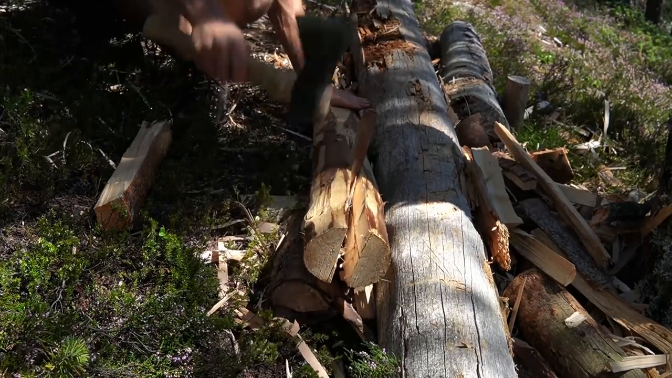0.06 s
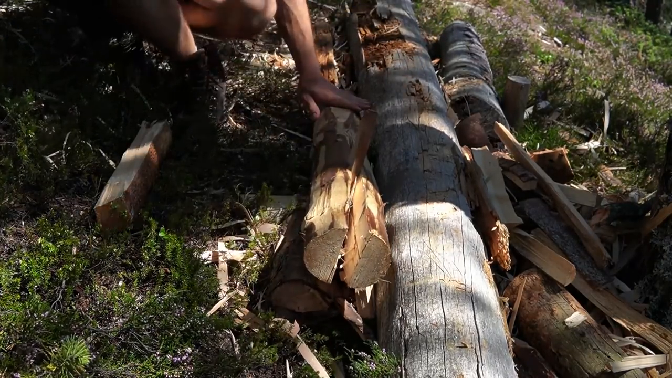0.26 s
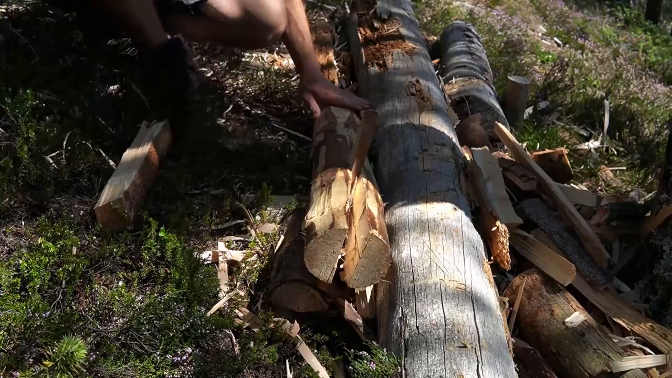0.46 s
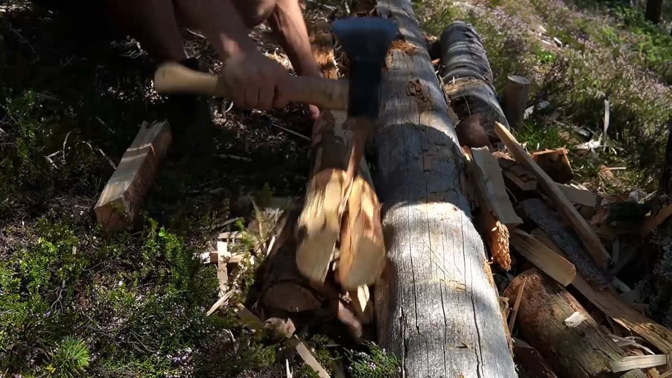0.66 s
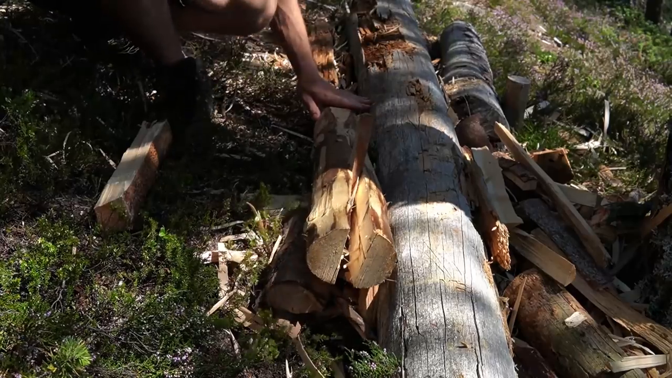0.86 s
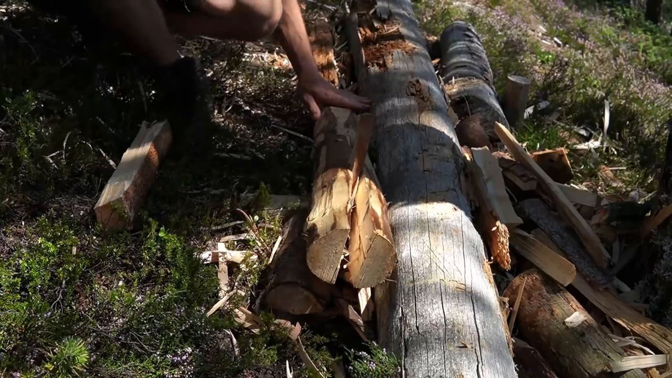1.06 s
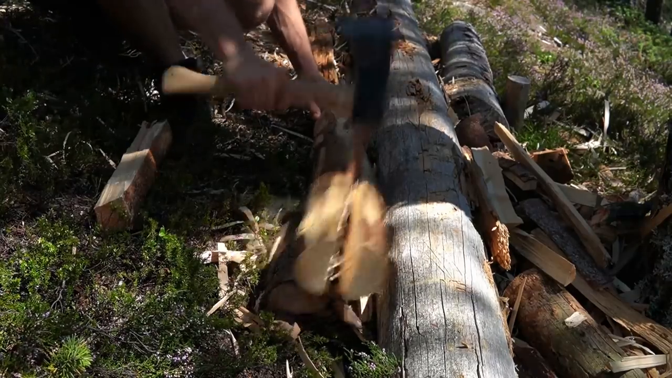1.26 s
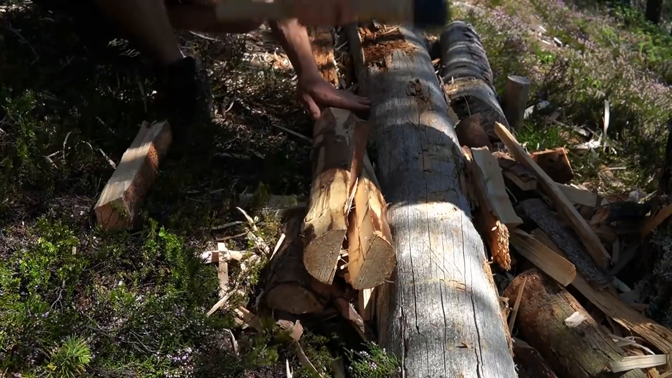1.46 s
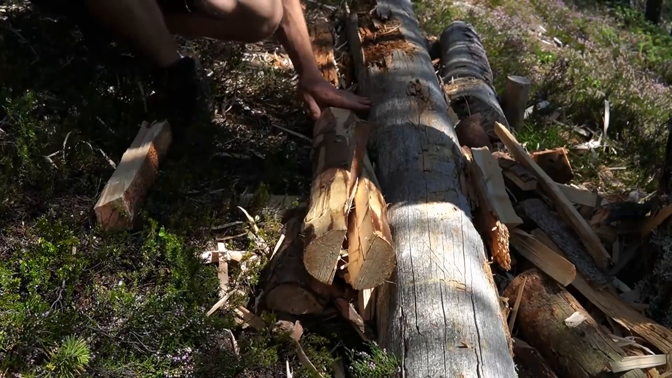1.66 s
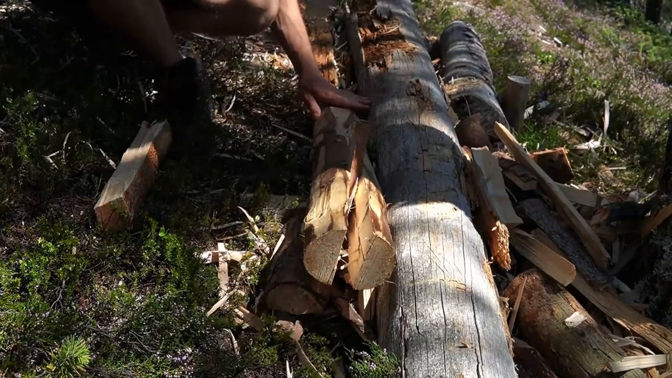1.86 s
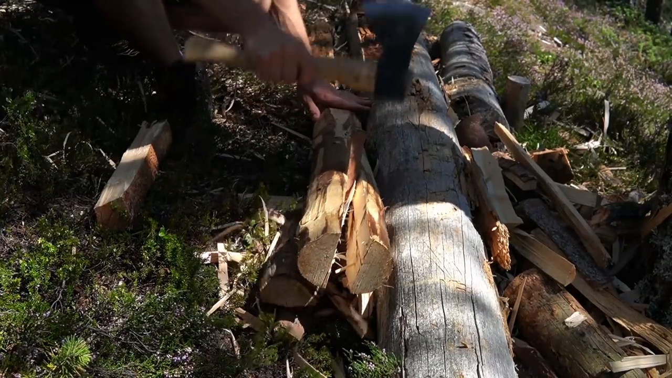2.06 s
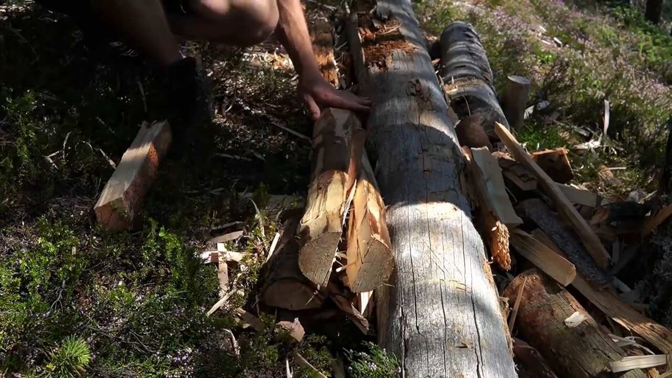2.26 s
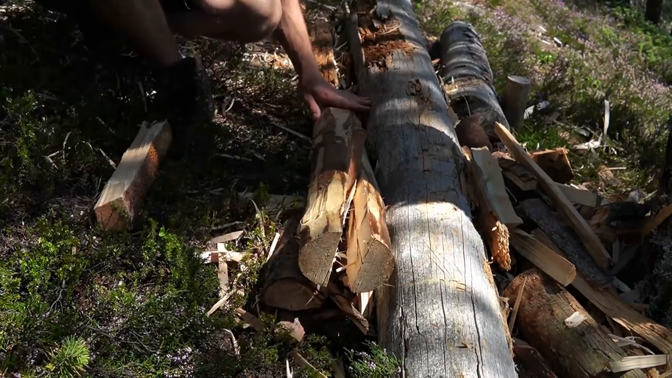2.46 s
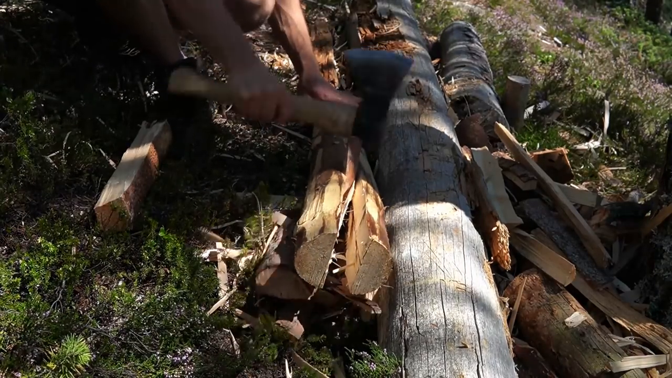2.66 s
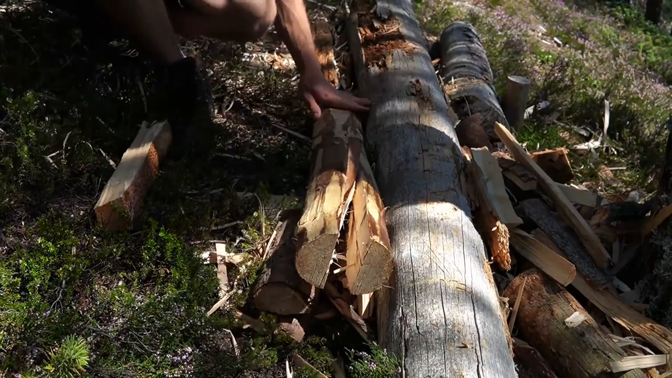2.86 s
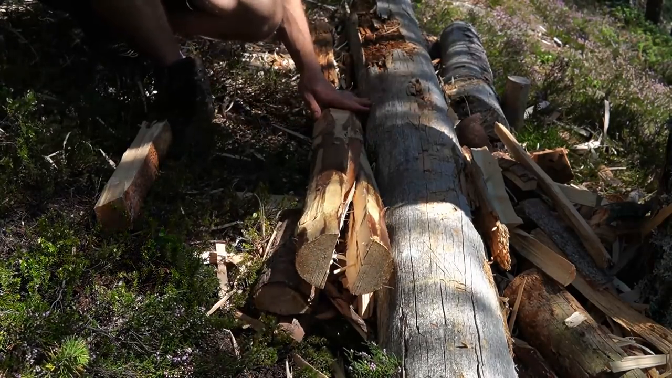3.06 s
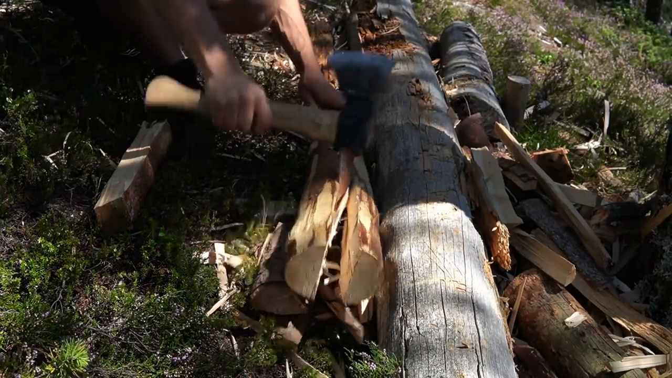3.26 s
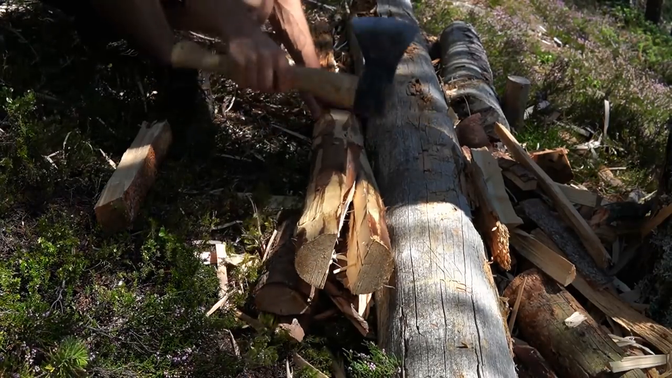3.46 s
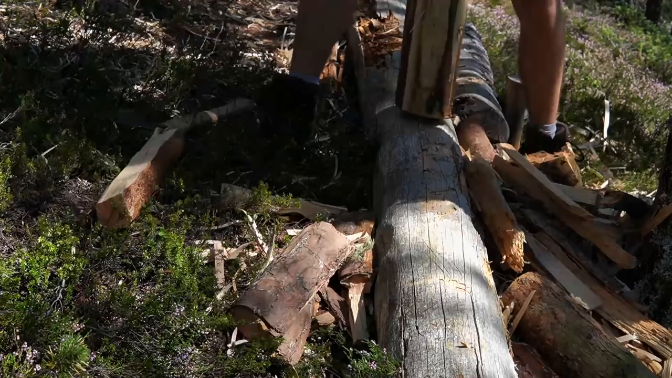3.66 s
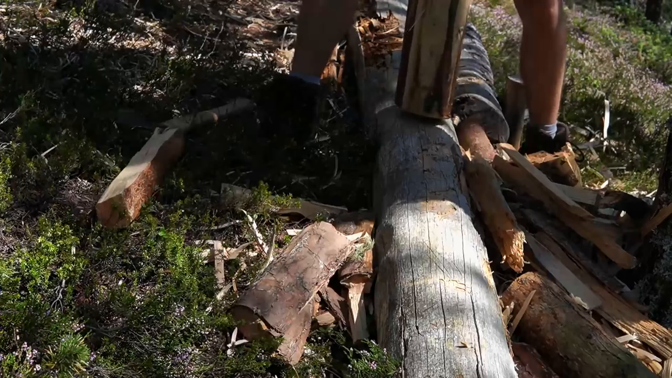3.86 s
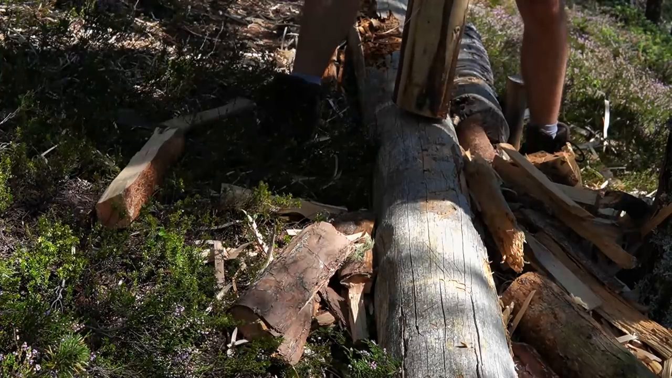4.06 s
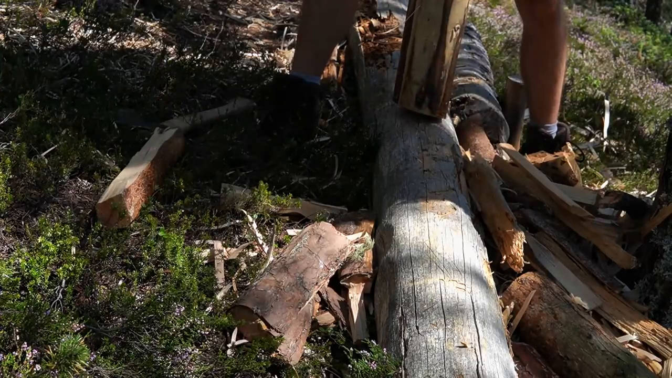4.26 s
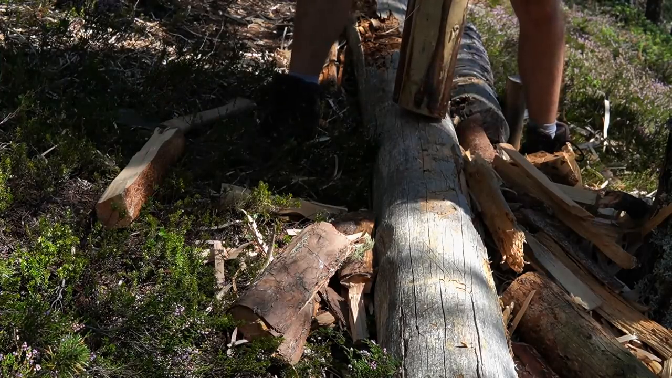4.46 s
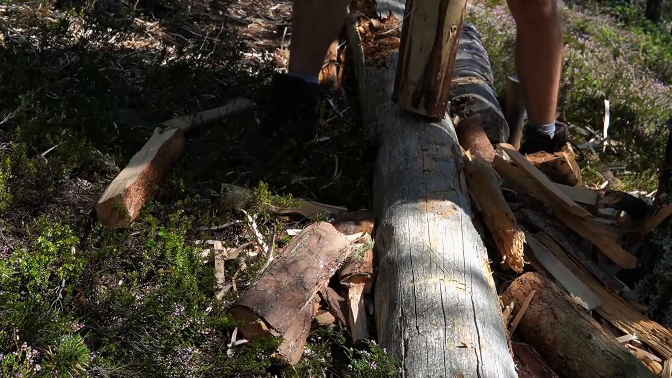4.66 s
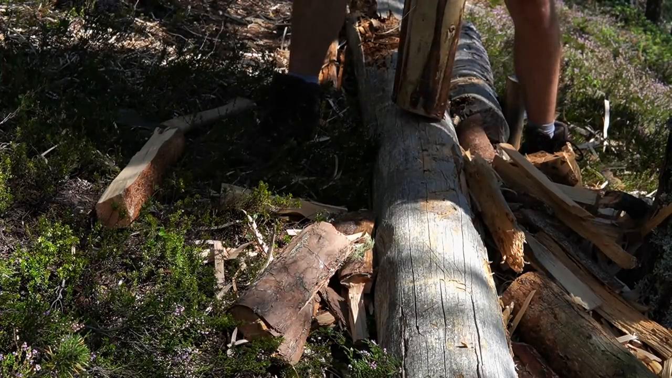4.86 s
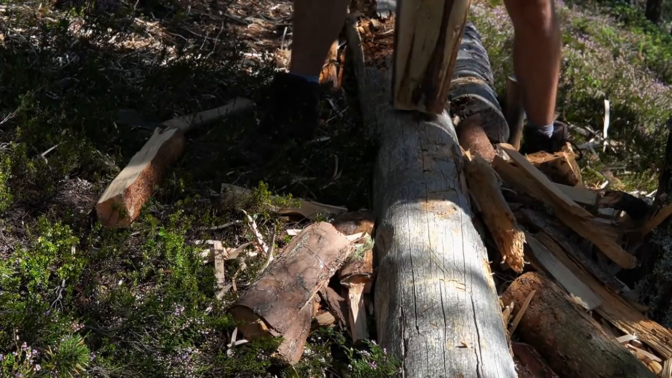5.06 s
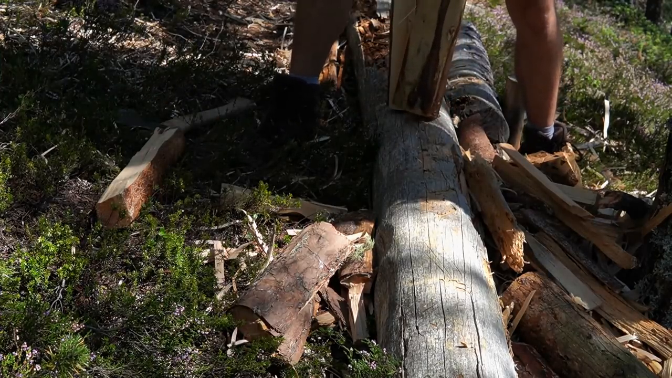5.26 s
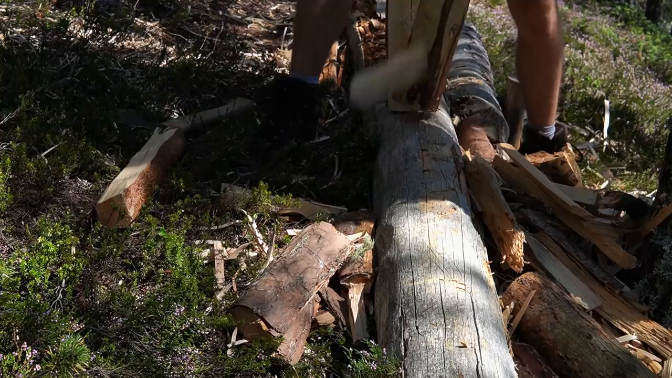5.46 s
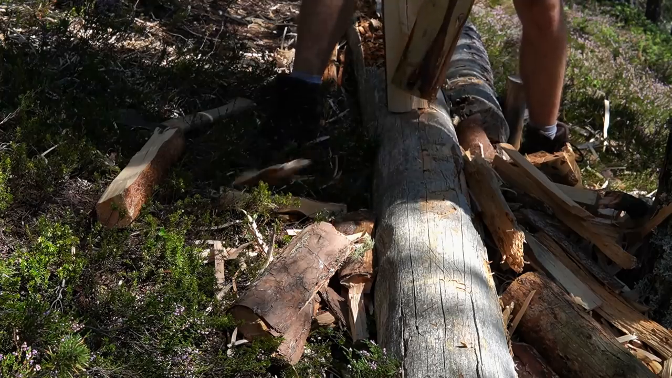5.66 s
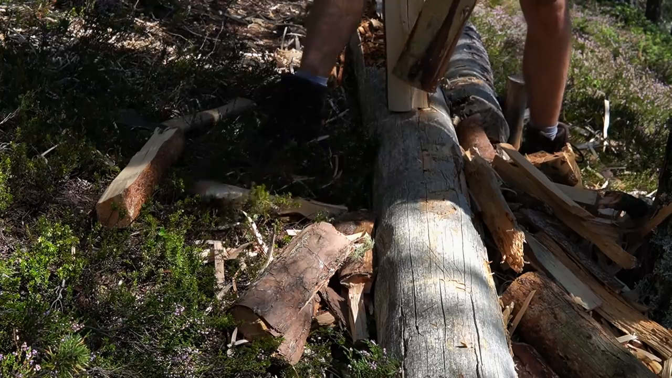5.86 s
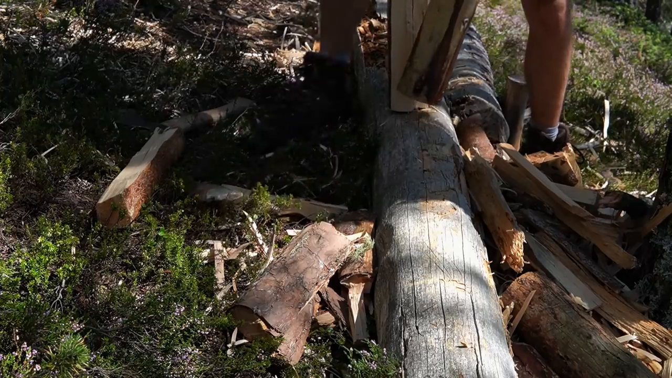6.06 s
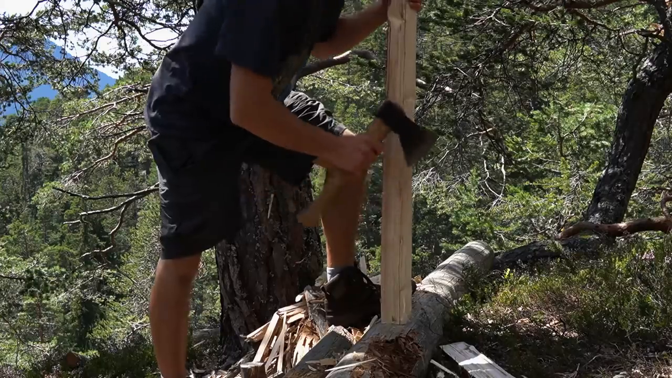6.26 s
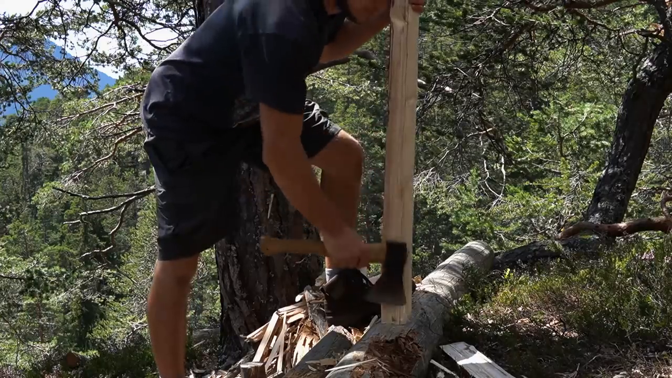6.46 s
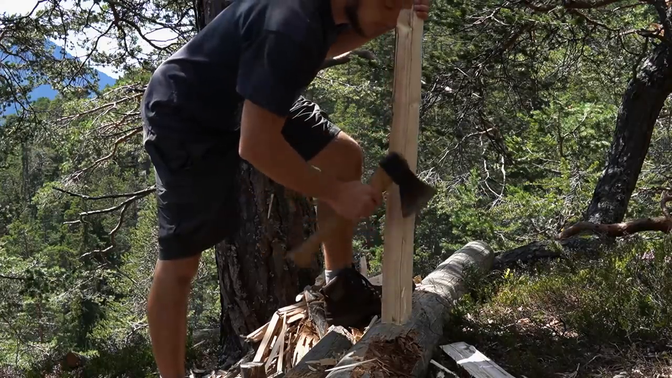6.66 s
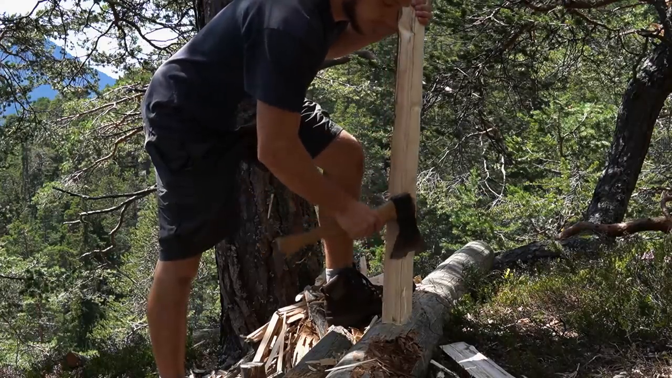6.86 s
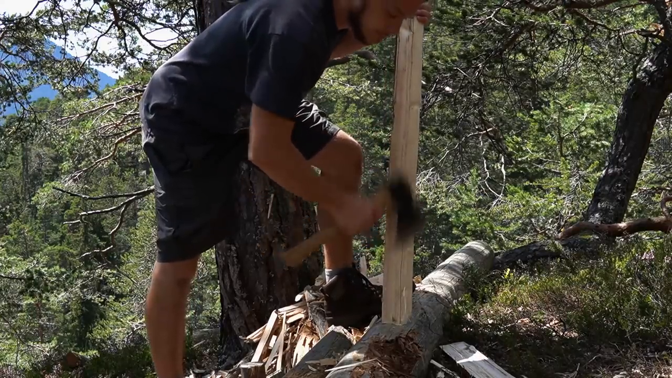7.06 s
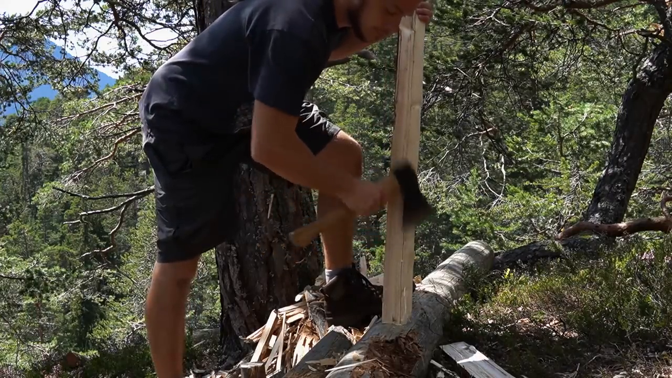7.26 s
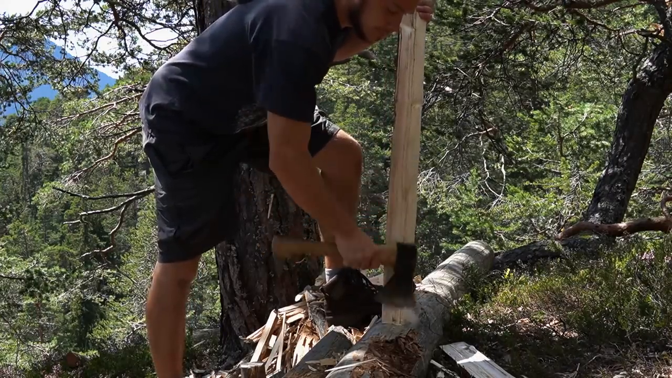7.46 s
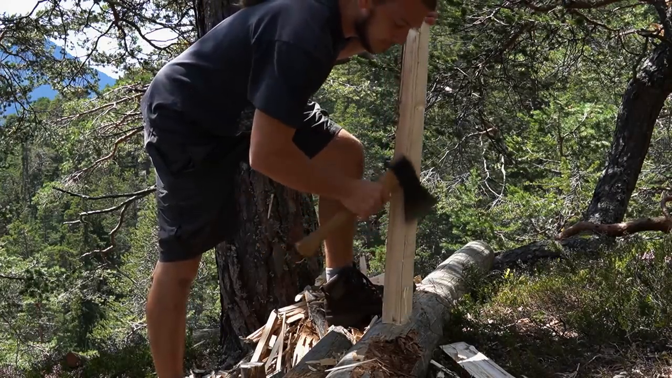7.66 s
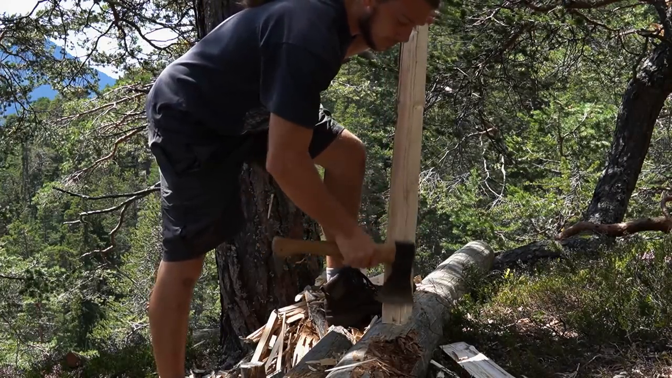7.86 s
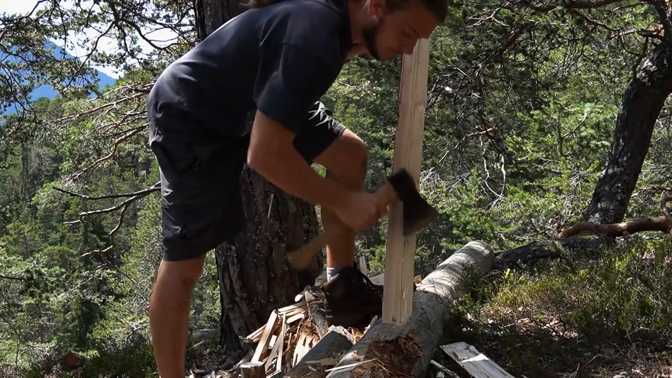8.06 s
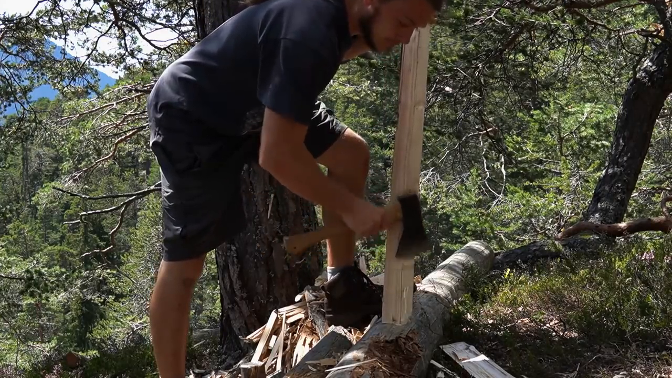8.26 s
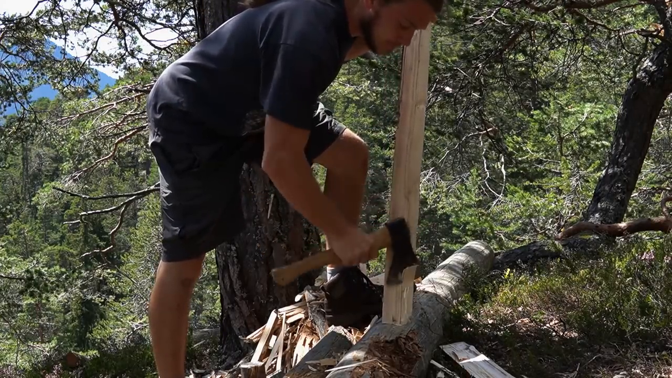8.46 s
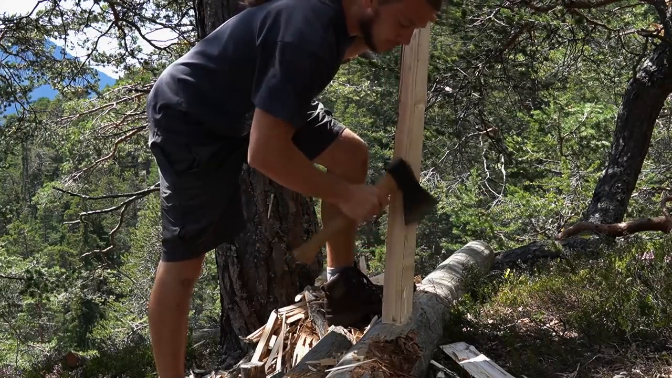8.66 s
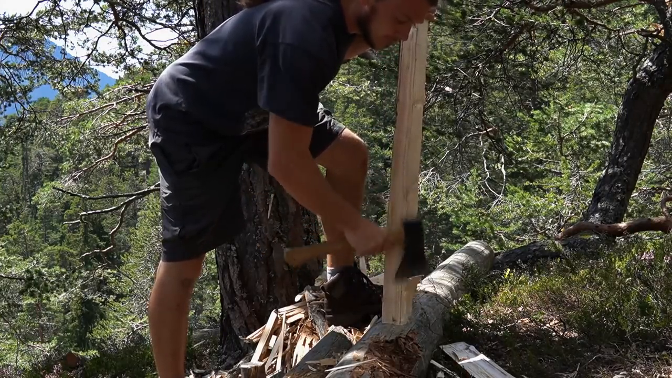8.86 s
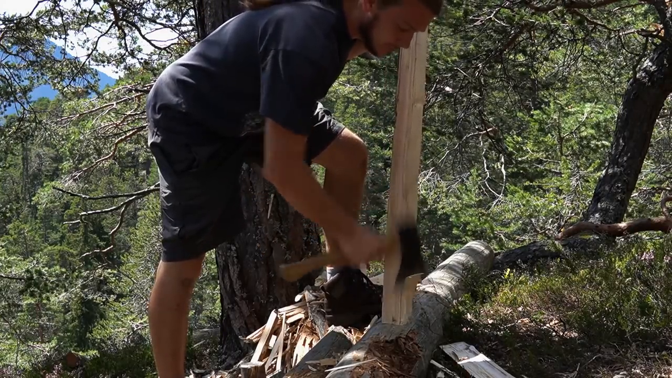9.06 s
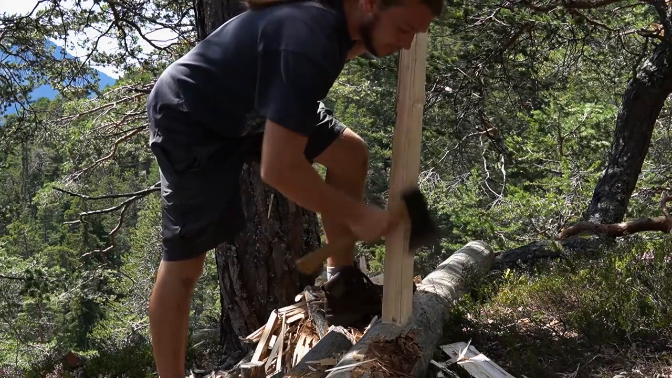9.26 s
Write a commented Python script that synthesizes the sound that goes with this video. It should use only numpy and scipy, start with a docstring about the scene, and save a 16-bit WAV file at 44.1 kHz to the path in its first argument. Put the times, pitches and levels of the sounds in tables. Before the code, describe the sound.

Outdoors in a forest, low wind buffets the microphone while a hatchet strikes a log five times, loud and bright, with knocking wood, tearing fibres and faintly singing steel. The wind abruptly drops; a billet is pried apart with sharp snaps and one piece lands with a hollow knock. Quick, much quieter strokes then trim an upright pole.

```python
"""Gusty wind in a forest, with wood shaking and steel ringing faintly, opens onto hatchet blows into a log.
The log rings at its modes and knocks on its neighbours; fibres tear as shaped noise and snap as short cracks.
After a cut to a second scene a standing billet is prised apart, its fibres snapping, and a piece drops as a
ring of its own modes; last, quick light strokes trim an upright pole. The steel head sings on after blows as
beating, fluttering sines, bent in pitch by its swing. The wind is low noise under gust curves, over a soft hiss."""
import sys
import numpy as np
from scipy import signal
from scipy.fft import rfft, irfft
from scipy.io import wavfile
from scipy.ndimage import uniform_filter1d

SR = 44100
rng = np.random.default_rng(int(sys.argv[2]) if len(sys.argv) > 2 else 0)


def materialize(psi):
    """Save the field psi as 16-bit PCM at rate SR to the path in sys.argv[1].

    A 1-D psi becomes a single channel; in a 2-D psi each row is a channel.
    """
    bounded = np.clip(np.atleast_2d(psi).T, -1, 1)
    quanta = np.round(bounded * 32767).astype(np.int16)
    wavfile.write(sys.argv[1], SR, quanta)


N = 410130
SCENE_CUT_S = 3.635  # cut from the log scene to the billet and pole scenes

# Hatchet blows into the log, then strokes on the pole. Each row: start in seconds, knock pitch in Hz,
# knock in dB, slap pitch in Hz, slap in dB, crack in dB, top octave in dB, thud in dB, knock t60 in seconds.
HEAVY_BLOWS = [(0.6902, 850, -6, 1514, 2, -1, -19, -23.5, 0.021),
               (1.3147, 830, -7, 1464, 1.5, 0.5, -5.5, -18, 0.018),
               (1.9697, 838, -5.5, 1850, -0.5, -2.5, -7, -13.5, 0.019),
               (2.6205, 831, -3, 1394, -3, 2, -14.5, -23, 0.022),
               (3.306, 802, -2, 1500, -5, -1.5, -11, -15, 0.017)]
LIGHT_BLOWS = [(6.4452, 420, -19.5, 970, -25, -37, -42, -19.5, 0.012),
               (6.7974, 649, -13, 1191, -24.5, -25.5, -38.5, -20, 0.021),
               (7.128, 670, -9.5, 1150, -21, -34.5, -47, -18, 0.014),
               (7.451, 750, -15.5, 1216, -17, -14.5, -38.5, -21.5, 0.024),
               (7.791, 781, -17, 1233, -12.5, -34, -57, -22, 0.03),
               (8.174, 793, -10, 1233, -8.5, -22, -38, -19, 0.02),
               (8.4766, 613, -14.5, 1214, -9, -23, -45, -43, 0.015),
               (8.7887, 792, -15.5, 1214, -21.5, -25.5, -52, -22.5, 0.029),
               (9.0896, 797, -24, 1250, -21, -33, -47.5, -26.5, 0.031)]
# Modes of the log and of the pole. Each row: frequency in Hz, level in dB, t60 in seconds.
LOG_MODES = [(254.3, -0.5, 0.11), (364.6, 1.5, 0.08), (563, -9.5, 0.013), (847, -1, 0.048),
             (1374, -12.5, 0.13)]
POLE_MODES = [(236, 4.5, 0.022), (340, 8.5, 0.018), (522, -16, 0.078), (775, -3, 0.034)]


def gain_of(db):
    """Amplitude factor of a level in dB."""
    return 10 ** (np.asarray(db) / 20)


def evened(x):
    """Scales x to rms 1."""
    return x / np.sqrt(np.mean(x ** 2) + 1e-20)


def peaked(x):
    """Scales x to peak 1."""
    return x / (abs(x).max() + 1e-12)


def add(mix, start_s, sound):
    """Adds a sound into the mix in place, cut at the end."""
    part = mix[round(start_s * SR):][:len(sound)]
    part += sound[:len(part)]


def above(x, hz):
    """Fourth-order high-pass."""
    return signal.sosfilt(signal.butter(4, hz, "high", fs=SR, output="sos"), x)


def below(x, hz):
    """Fourth-order low-pass."""
    return signal.sosfilt(signal.butter(4, hz, "low", fs=SR, output="sos"), x)


def coloured(x, points):
    """Filters x by a curve of (Hz, dB) points, straight in log frequency; rms 1."""
    point_hz, point_db = np.transpose(points)
    hz = np.fft.rfftfreq(len(x), 1 / SR)
    db = np.interp(np.log(hz + 1), np.log(point_hz + 1), point_db)
    return evened(irfft(rfft(x) * gain_of(db), len(x)))


def resonate(x, hz, width_hz):
    """A two-pole resonance of gain 1."""
    return signal.lfilter(*signal.iirpeak(hz, hz / max(width_hz, 1), SR), x)


def body(x, modes):
    """Noise x through the modes of a piece of wood; a mode's width is set by its t60."""
    out = 0
    for k, (hz, db, t60_s) in enumerate(modes):
        out = out + (-1) ** k * gain_of(db) * evened(resonate(x, hz, 2.0 / t60_s))
    return evened(out)


def ring(modes, rise_ms):
    """Modes struck once, peak 1; their strengths differ a little, as each blow lands elsewhere."""
    t = np.arange(round(.2 * SR)) / SR
    out = 0
    for k, (hz, db, t60_s) in enumerate(modes):
        fall = gain_of(db + 2.6 * rng.standard_normal() - 60 * t / t60_s)
        out = out + (-1) ** k * fall * np.sin(2 * np.pi * hz * t)
    return peaked(out * (1 - np.exp(-t * 1000 / rise_ms)))


def dying(t60_s):
    """Noise with a sudden sharp start that dies in t60_s, over a fainter and longer tail."""
    t = np.arange(round(.2 * SR)) / SR
    fall = gain_of(-60 * t / max(t60_s, .004))
    tail = gain_of(-22.5 - 60 * t / max(1.2 * t60_s, .01))
    spike = np.exp(-t / 0.00045)
    return rng.standard_normal(len(t)) * (fall + tail + spike) * np.minimum(t / 0.00023, 1)


def tick(t60_s, low_hz, high_hz, hz):
    """A crack as its middle band, with one favoured pitch, and its top octave; each peak 1."""
    x = dying(t60_s)
    middle = above(below(x, high_hz), low_hz)
    top = below(above(x, 7500), 15000)
    return peaked(middle + 2.0 * resonate(middle, hz, 900)), peaked(top)


def grainy(rough_db, size):
    """Noise whose level flickers by rough_db rms in grains of size samples."""
    flicker = evened(uniform_filter1d(rng.standard_normal(N), size))
    return rng.standard_normal(N) * gain_of(rough_db * flicker)


def envelope(tables, column):
    """Gain over time from tables of dB curves, silent between them."""
    t, out = np.arange(N) / SR, np.zeros(N)
    for rows in tables:
        rows = np.array(rows)
        out += gain_of(np.interp(t, rows[:, 0], rows[:, column], -200, -200))
    return uniform_filter1d(out, size=180)


def swell(start_s, rise_s, rise_db, peak_db, fall_db_per_s):
    """Gain that climbs rise_db to its peak, then falls evenly; stops at the next blow, the scene cut or the end."""
    t = np.arange(N) / SR
    late_s = t - start_s - rise_s
    stops_s = np.array([row[0] for row in HEAVY_BLOWS + LIGHT_BLOWS] + [SCENE_CUT_S, N / SR])
    alive = (t >= start_s) & (t < stops_s[stops_s > start_s + .1].min())
    return alive * gain_of(peak_db + np.where(late_s < 0, rise_db * late_s / rise_s, -fall_db_per_s * late_s))


def wind():
    """Low buffeting on the microphone, deeper in the early gusts, over the soft, nearly steady hiss of far leaves."""
    # Gust curves. Each row: time in seconds, level in dB.
    gusts = [
        [(0.0, -41), (0.72, -30.5), (1.65, -36.5), (3.35, -30.5), (3.64, -37.5)],
        [(3.64, -48.5), (3.81, -62.5), (4.37, -65.5), (5.44, -62), (6.18, -52)],
        [(6.18, -52.5), (6.54, -59.5), (7.03, -54), (7.2, -61), (7.85, -57), (8.48, -67), (9.3, -51)],
    ]
    # Spectra of early gusts, lighter wind and far leaves. Each row: frequency in Hz, density in dB per Hz.
    gusty_spectrum = [(8.8, -31), (15, -4), (43, -0.5), (81, -0.5), (164, -8.5), (396, -34), (600, -39),
                      (780, -55.5), (1320, -120)]
    calm_spectrum = [(12, -23), (25, -7), (50, 1.5), (85, 4.5), (150, -4), (260, -14.5), (420, -55.5)]
    leaf_spectrum = [(59, -45.5), (100, -5.5), (141, -4.5), (262, -11.5), (418, -16.5), (541, -20.5),
                     (1050, -19), (1190, -18.5), (4480, -26.5), (7020, -39), (14500, -45.5), (16500, -55)]
    leaf_db = -58.5
    noise = rng.standard_normal(N)
    gusty = np.arange(N) / SR < gusts[0][-1][0]
    buffet = np.where(gusty, coloured(noise, gusty_spectrum), coloured(noise, calm_spectrum))
    leaves = coloured(grainy(rough_db=.4, size=4000), leaf_spectrum)
    return buffet * envelope(gusts, column=1) + gain_of(leaf_db) * leaves


def crackling(per_s):
    """Hiss broken by sparse tiny bursts, a few of them large."""
    size = gain_of(4.0 * np.minimum(rng.exponential(1, N), 3)) * (rng.random(N) < per_s / SR)
    bursts = signal.lfilter([1], [1, -np.exp(-1 / (0.00084 * SR))], size)
    return grainy(rough_db=2.0, size=100) * (1 + 2.0 * bursts)


def tearing():
    """Loose contact shakes the wood; parting fibres and chips hiss and crackle."""
    # Loose wood after blows, swelling then dying. Each row: start in seconds, swell in seconds,
    # shaking in dB, tearing in dB, top octave in dB, fall of the tearing in dB per second.
    after_blows = [(-0.04, 0.048, -38, -44, -54.5, 150), (0.689, 0.043, -30.5, -33.5, -50.5, 117.5),
                   (1.313, 0.049, -31, -33.5, -43.5, 116), (1.97, 0.031, -28, -34.5, -45.5, 132.5),
                   (2.622, 0.022, -23, -31.5, -45, 162.5), (3.306, 0.031, -32, -36.5, -47.5, 146),
                   (6.4472, .01, -38, -41, -47.5, 456), (6.796, 0.0041, -26, -42, -58, 700),
                   (7.128, 0.0059, -28.5, -40.5, -42, 700), (7.451, 0.015, -34, -40, -41, 388),
                   (7.791, 0.01, -34, -42, -53, 252), (8.173, 0.009, -34, -40.5, -72, 500),
                   (8.478, 0.0087, -24.5, -37, -48.5, 701), (8.789, 0.013, -38, -45, -49, 305),
                   (9.09, 0.083, -37.5, -45.5, -54, 248)]
    # Log shifted, billet strained. Each row: time in seconds, fibres in dB, top octave in dB.
    strain = [
        [(0.36, -71, -74), (0.516, -49.5, -56.5), (0.612, -59.5, -59.5), (0.66, -65, -76)],
        [(3.66, -78.5, -88), (3.9, -83.5, -69.5), (4.2, -88, -82), (4.5, -82.5, -70), (4.64, -57.5, -60.5),
         (4.75, -77, -67.5), (4.805, -44, -48.5), (4.86, -71, -59), (4.9, -60, -51), (4.95, -81.5, -64),
         (5.06, -66, -62), (5.075, -41.5, -39), (5.17, -42.5, -45), (5.2, -55.5, -56), (5.28, -55, -61),
         (5.33, -82.5, -81), (5.55, -77.5, -88.5), (5.585, -59, -69.5), (5.66, -65, -67), (5.7, -57, -59),
         (5.76, -68, -65), (5.86, -65, -60), (5.96, -65.5, -62.5), (6.175, -58.5, -60.5)],
    ]
    # Low scuffing of the billet's foot. Each row: time in seconds, level in dB.
    groan = [
        [(3.64, -63), (4.2, -72.5), (5.5, -74.5), (5.76, -61), (5.92, -73), (6.1, -66.5), (6.175, -60)],
    ]
    # Spectra of parting fibres and of rubbed wood. Each row: frequency in Hz, density in dB per Hz.
    tear_spectrum = [(590, -42.5), (1000, -6.5), (1390, -2), (1820, -4.5), (4540, -12), (6610, -30),
                     (15000, -41), (16500, -51.5)]
    scuff_spectrum = [(120, -41.5), (220, -4), (400, 2), (800, -4.5), (1300, -10.5), (1800, -43)]
    swell_db, shake_fall, top_fall = 6.5, 1.34, 0.87  # falls relative to tearing
    groan_db, dry_hz = -4, 1810  # groan relative to fibres; thin billet fibres crackle only above dry_hz

    after_cut = np.arange(N) / SR > SCENE_CUT_S
    shake = grainy(rough_db=2.0, size=300)
    scuff = coloured(shake, scuff_spectrum)
    wood = np.where(after_cut, scuff, body(shake, LOG_MODES) + .4 * scuff)
    noise = crackling(per_s=70)
    middle = evened(below(coloured(noise + 2.2 * rng.standard_normal(N), tear_spectrum), 7000))
    top = evened(above(coloured(noise, tear_spectrum), 7000))
    thin = np.where(after_cut, evened(above(middle, dry_hz)), middle)

    out = (gain_of(groan_db) * wood + thin) * envelope(strain, column=1)
    out = out + wood * envelope(groan, column=1)
    out = out + top * envelope(strain, column=2)
    for start_s, swell_s, shake_db, tear_db, top_db, fall_db_per_s in after_blows:
        out = out + wood * swell(start_s, swell_s, swell_db, shake_db, shake_fall * fall_db_per_s)
        out = out + middle * swell(start_s, swell_s, swell_db, tear_db, fall_db_per_s)
        out = out + top * swell(start_s, swell_s, swell_db, top_db, top_fall * fall_db_per_s)
    return out


def steel():
    """Modes of the freed head; they flutter as the blade turns, and the swing bends the lowest in pitch."""
    # Each row: start in seconds, lowest mode in dB, upper modes in dB,
    # fall of the lowest mode in dB per second, beating from 0 to 1.
    songs = [(-0.02, -49.5, -90, 46, 0.1), (0.73, -52, -98, 57, .3), (1.345, -38, -87.5, 55, 0),
             (2.0, -49, -88, 50, 0.1), (2.65, -50, -85.5, 66, 0.6), (3.335, -50.5, -92.5, 74, 0.5),
             (6.447, -67, -75, 50, .1), (7.23, -68, -87, 96, 0), (7.451, -29, -57, 800, 0.4),
             (7.55, -69, -80, 49, 0.4), (7.792, -38, -64, 350.5, 0), (7.86, -63.5, -76, 48, 0.3),
             (8.58, -70.5, -81, 203, 0), (8.87, -66.5, -80.5, 74, 0), (9.13, -40.5, -59.5, 300, .1),
             (9.17, -55, -81, 30, 0.1)]
    # Each row: frequency in Hz, level in dB.
    head_modes = [(4385, 0), (7698, 0), (9808, -18), (11010, 0), (11770, -4)]
    beat_hz, dip_s = 10.0, 0.14  # two close partials come to beat; first dip after the start
    free_s, free_db = .02, 14  # rise as the blade comes free
    swing_s, swing_m_per_s, lag_s = .62, .9, .05  # head draws away and returns: period, peak speed, delay
    upper_fall = 2.4  # upper modes die this many times faster
    sound_m_per_s = 343

    t = np.arange(N) / SR
    slow_noise = uniform_filter1d(uniform_filter1d(rng.standard_normal(N), size=900), size=900)
    waver = gain_of(1.1 * evened(slow_noise))
    upper = np.zeros(N)
    for hz, db in head_modes[1:]:
        flutter_db = 6 * np.sin(2 * np.pi * (rng.uniform(4.7, 11) * t + rng.random()))
        upper += gain_of(db + flutter_db) * np.sin(2 * np.pi * hz * t)

    out = np.zeros(N)
    for start_s, low_db, upper_db, fall_db_per_s, beating in songs:
        since_s = t - start_s
        swing = np.sin(2 * np.pi * (since_s - lag_s) / swing_s)
        nearer_m = swing_m_per_s * swing_s / (2 * np.pi) * swing
        low = waver * np.sin(2 * np.pi * head_modes[0][0] * (t + nearer_m / sound_m_per_s))
        depth = np.clip(beating * since_s / dip_s, 0, min(beating, 1))
        beat = 1 - depth * np.cos(2 * np.pi * beat_hz * (since_s - dip_s))
        out += low * beat * swell(start_s, free_s, free_db, low_db, fall_db_per_s)
        out += upper * swell(start_s, free_s, free_db, upper_db, upper_fall * fall_db_per_s)
    return np.sqrt(2) * out  # sines to rms 1


def rebound(row, modes):
    """A soft wooden landing with a click of bark."""
    start_s, db, click_db = row
    click, _ = tick(0.022, 900, 7000, 2600)
    return start_s, gain_of(db) * ring(modes, rise_ms=4.4) + gain_of(click_db) * click


def log_knocks(mix):
    """The log knocks on its neighbours, once when shifted by hand, then after blows, ringing its modes."""
    # Each row: start in seconds, peak in dB, click in dB.
    knocks = [(0.522, -37, -39), (0.705, -23, -43), (0.732, -27, -43), (0.763, -25, -48),
              (1.346, -17.5, -20.5), (1.409, -30, -43), (1.981, -22, -45.5), (2.005, -15, -38.5),
              (2.6656, -10.5, -12.5), (3.331, -37.5, -36.5)]
    for row in knocks:
        add(mix, *rebound(row, LOG_MODES))


def blow(row, modes, high_hz, clink_db):
    """The edge cracks the fibres and clinks, the struck spot rings at two pitches, and the whole piece thuds."""
    start_s, knock_hz, knock_db, slap_hz, slap_db, crack_db, top_db, thud_db, t60_s = row
    knock_modes = [(knock_hz, 0, t60_s), (.7 * knock_hz, -8, 0.66 * t60_s), (1.3 * knock_hz, -8, 0.85 * t60_s)]
    knock = ring(knock_modes, rise_ms=0.022)
    crush = peaked(above(below(dying(1.2 * t60_s), 2600), 800))  # wood crushed under the edge
    slap_modes = [(slap_hz, 0, 0.94 * t60_s), (1.3 * slap_hz, -7, .5 * t60_s)]
    slap = 0.61 * ring(slap_modes, rise_ms=0.038) + 0.72 * crush
    crack, top = tick(0.56 * t60_s, 2200, high_hz, 4200)
    clink = gain_of(clink_db) * ring([(4480, 0, .03)], rise_ms=.2)  # relative to the crack
    thud = ring(modes, rise_ms=0.37)
    out = gain_of(knock_db) * knock + gain_of(slap_db) * slap + gain_of(crack_db) * (crack + clink)
    return start_s, out + gain_of(top_db) * top + gain_of(thud_db) * thud


def heavy_blows(mix):
    """The hatchet drives into the log: bright cracks, faint clinks."""
    for row in HEAVY_BLOWS:
        add(mix, *blow(row, LOG_MODES, high_hz=7360, clink_db=-20.5))


def snaps(mix):
    """Fibres snap, chips break off or land: broad crackle, with a splinter ringing briefly at its own pitch."""
    # Each row: start in seconds, level in dB, centre in Hz, top octave in dB relative to the snap.
    cracks = [(0.856, -29, 1520, -16), (1.5, -37, 3040, -15), (1.5154, -34, 2730, -16),
              (1.5528, -32, 1410, -14), (1.592, -44.5, 6370, -29), (1.638, -36.5, 1460, -26),
              (1.6995, -36.5, 1660, -15), (1.79, -41, 1410, -16), (1.801, -38.5, 1450, -23),
              (1.9355, -32.5, 1410, -26), (2.105, -23.5, 1950, -11.5), (2.3176, -32, 3170, -25.5),
              (2.7702, -39, 1710, -25.5), (2.794, -46, 6500, 1), (3.157, -38, 1830, -20),
              (3.72, -46, 1510, -8), (3.7966, -42, 3580, -7), (4.2843, -25, 4240, -14.5),
              (4.292, -34, 1830, -10), (4.315, -28, 2700, -13), (4.363, -22, 4570, -17),
              (4.4055, -14.5, 2040, -17.5), (4.451, -45, 4930, -4), (4.506, -54, 6500, -5),
              (4.5441, -32, 3930, -14), (4.617, -25.5, 2810, -8), (4.634, -30, 3160, -12),
              (4.662, -19, 4360, -14), (4.7236, -49, 5180, 4), (4.749, -22.5, 4140, -15),
              (4.754, -11.5, 6380, -3.5), (4.779, -40, 4000, 13), (4.7945, -7.5, 5880, -1.5),
              (4.8954, -34.5, 7670, 6), (4.993, -36.5, 6700, 1.5), (5.019, -43, 5000, -3),
              (5.0276, -34.5, 3170, -4), (5.0576, -40, 4900, -13), (5.0681, -3.5, 5110, -8.5),
              (5.079, -4.5, 2165, -8), (5.1141, -21, 1560, -11), (5.119, -12.5, 3850, -5),
              (5.1269, -8, 5040, -11.5), (5.1438, -15, 4430, -6), (5.153, -16.5, 2280, -13),
              (5.162, -6.5, 4250, -15), (5.278, -37.5, 3990, -6), (5.283, -33, 2500, -22.5),
              (5.306, -32.5, 4510, -7), (5.611, -41.5, 3100, 0), (5.68, -40, 2100, -4),
              (5.687, -32, 2920, -9), (5.715, -41, 1220, -3), (5.835, -38, 3800, 1),
              (5.8637, -14.5, 3760, -4.5), (5.8954, -30.5, 5030, -2.5), (6.0276, -42.5, 1630, -15),
              (6.465, -32.5, 5940, 2.5), (7.131, -25, 1470, -16), (7.4762, -17.5, 4290, -21),
              (7.485, -33, 4400, 3), (7.235, -54, 5460, -4), (7.6763, -45.5, 1910, -3.5),
              (7.8037, -44, 4380, 3), (7.855, -34, 4460, -4.5), (8.292, -55, 6030, -1),
              (8.467, -50, 7000, -4), (8.777, -46, 4520, -6), (8.8014, -21.5, 4450, -19),
              (8.8147, -19, 4050, -6.5), (9.114, -32, 2144, -32), (9.1365, -21, 4570, -14),
              (9.141, -19, 4680, -8), (9.205, -37, 1580, -10.6)]
    t60_at_3khz_s, slope = .022, .3  # thinner, higher splinters die sooner
    for start_s, db, hz, top_db in cracks:
        t60_s = t60_at_3khz_s * (3000 / hz) ** slope
        crack, top = tick(t60_s, np.clip(.3 * hz, 700, 1600), 7465, hz)
        splinter = ring([(hz, 0, 1.3 * t60_s)], rise_ms=0.16)
        add(mix, start_s, gain_of(db) * (crack + 0.25 * splinter + gain_of(top_db) * top))


def trunk_booms(mix):
    """The long trunk underneath booms at its low modes when a load shifts on it."""
    # Each row: start in seconds, peak in dB.
    booms = [(1.402, -24), (2.678, -29), (3.359, -29), (5.107, -31), (6.45, -37.5), (6.488, -39.5),
             (6.816, -36.5), (7.149, -34.5), (7.464, -39.5), (8.492, -39.5), (8.814, -34.5), (9.166, -27)]
    # Each row: frequency in Hz, level in dB, t60 in seconds.
    trunk_modes = [(143, 0, .17), (118, -8, .08), (180, -8, .07)]
    for start_s, db in booms:
        add(mix, start_s, gain_of(db) * ring(trunk_modes, rise_ms=6.4))


def billet_jolts(mix):
    """Jolts ring the modes of the whole billet."""
    # Each row: start in seconds, peak in dB.
    jolts = [(4.364, -47), (4.405, -50), (4.617, -45.5), (4.68, -49), (4.754, -35.5), (4.794, -29.5),
             (5.069, -25), (5.096, -23.5), (5.128, -34), (5.165, -61)]
    # Each row: frequency in Hz, level in dB, t60 in seconds.
    billet_modes = [(395.6, 6, 0.099), (440, -11, .05), (786, -12, 0.0387), (2196, -5.5, 0.056)]
    for start_s, db in jolts:
        add(mix, start_s, gain_of(db) * ring(billet_modes, rise_ms=0.31))


def piece_drop(mix):
    """The split piece lands, ringing its modes with a click."""
    # One row: start in seconds, peak in dB, click in dB.
    landing = (5.5687, -6, -31.5)
    # Each row: frequency in Hz, level in dB, t60 in seconds.
    piece_modes = [(261, -16, 0.21), (388.4, -15.5, 0.13), (450, -17, 0.066), (520, -5, 0.089),
                   (630, -3, 0.052), (851, 4.5, 0.022), (1170, -24.5, 0.069), (1380, -1, 0.016),
                   (1873, -9.5, 0.022), (2640, -25, 0.05), (3296, -11.5, 0.0078)]
    start_s, db, click_db = landing
    click, _ = tick(.02, 820, 9000, 3400)
    add(mix, start_s, gain_of(db) * ring(piece_modes, rise_ms=0.81) + gain_of(click_db) * click)


def light_strokes(mix):
    """Quick strokes trim the pole: duller cracks, stronger clinks relative to them."""
    for row in LIGHT_BLOWS:
        add(mix, *blow(row, POLE_MODES, high_hz=4560, clink_db=-3.0))


def pole_foot(mix):
    """The foot of the pole knocks on the trunk, ringing the pole's modes."""
    # Each row: start in seconds, peak in dB, click in dB.
    knocks = [(6.488, -33.5, -49), (7.152, -36, -50), (8.49, -35, -45), (9.1614, -16, -17.5)]
    for row in knocks:
        add(mix, *rebound(row, POLE_MODES))


def scene():
    """Sums the struck sounds, high-passed, with tearing, steel and wind."""
    hits = np.zeros(N)
    log_knocks(hits)
    heavy_blows(hits)
    snaps(hits)
    trunk_booms(hits)
    billet_jolts(hits)
    piece_drop(hits)
    light_strokes(hits)
    pole_foot(hits)
    return (wind() + tearing() + steel() + above(hits, 71))[None]


def record(dry):
    """Soft overload, strongest on the hardest blows; then the band limit."""
    ceiling, edge_hz = .72, 16600
    held = ceiling * np.tanh(dry / ceiling)
    edge = signal.firwin(511, edge_hz, window=("kaiser", 9), fs=SR)
    return signal.oaconvolve(held, edge[None], "same")


dry = scene()
out = record(dry)
materialize(out)
```